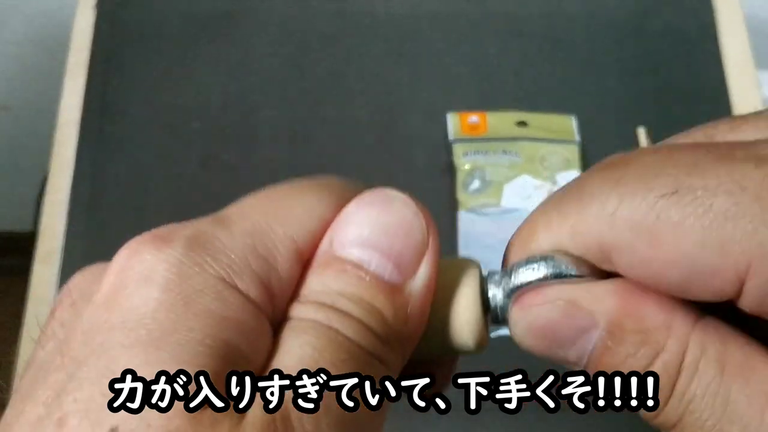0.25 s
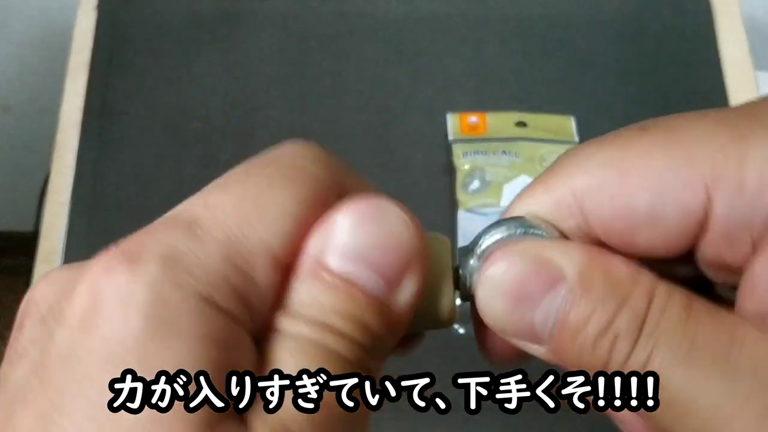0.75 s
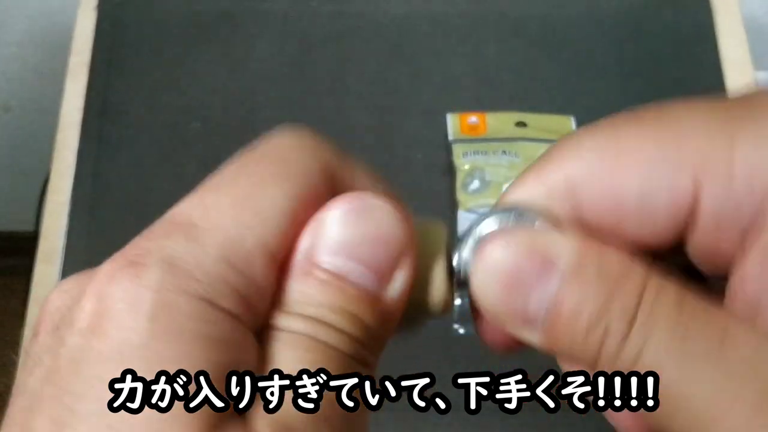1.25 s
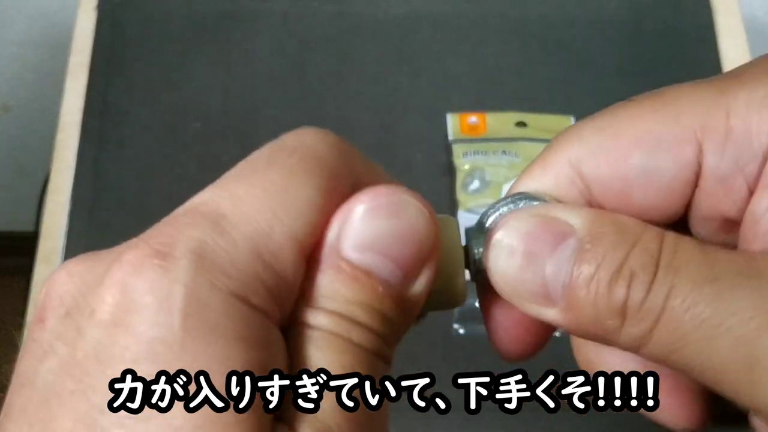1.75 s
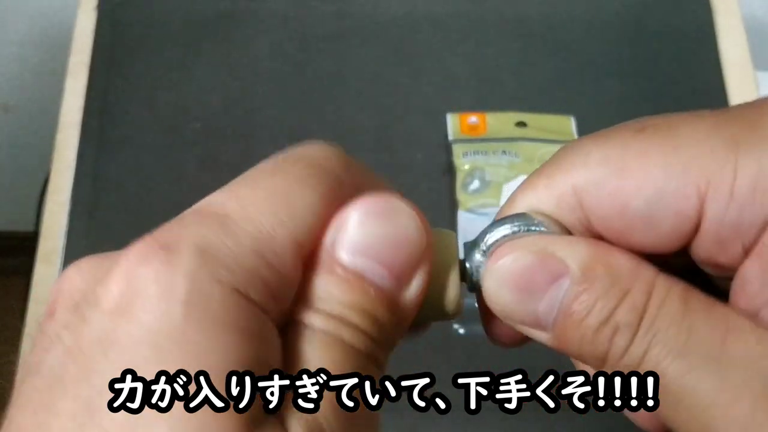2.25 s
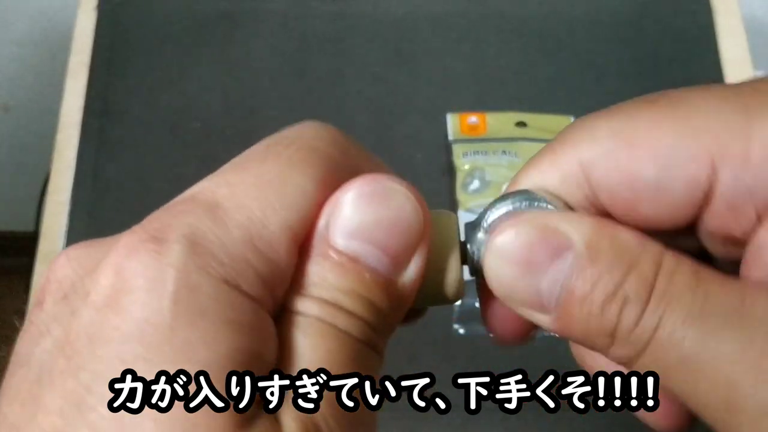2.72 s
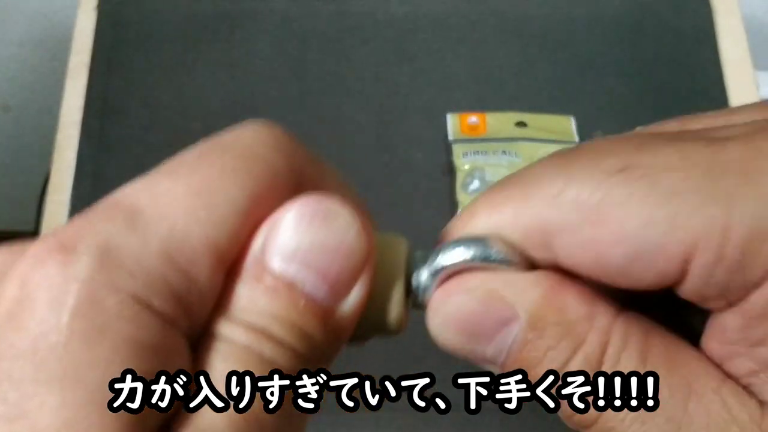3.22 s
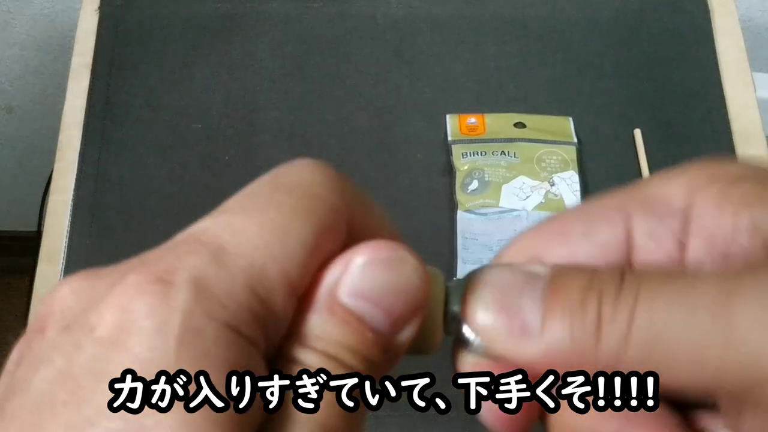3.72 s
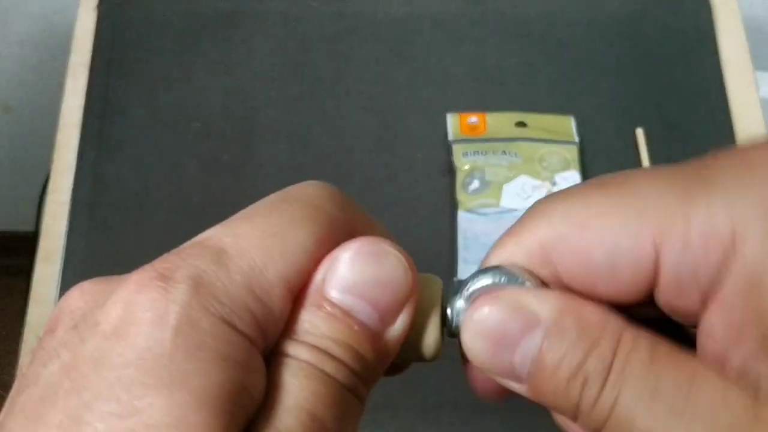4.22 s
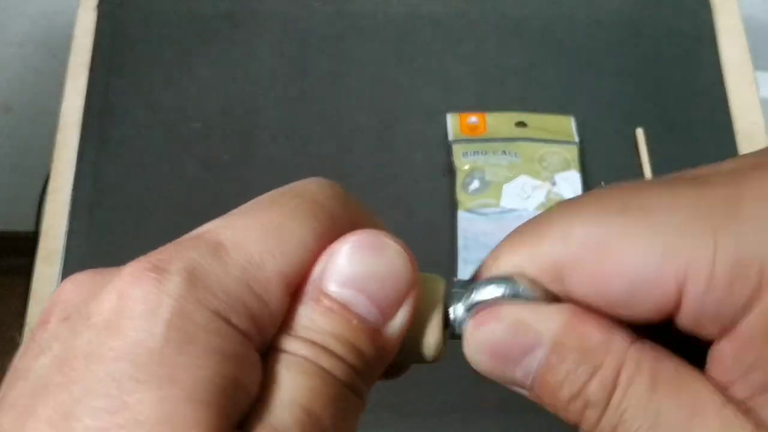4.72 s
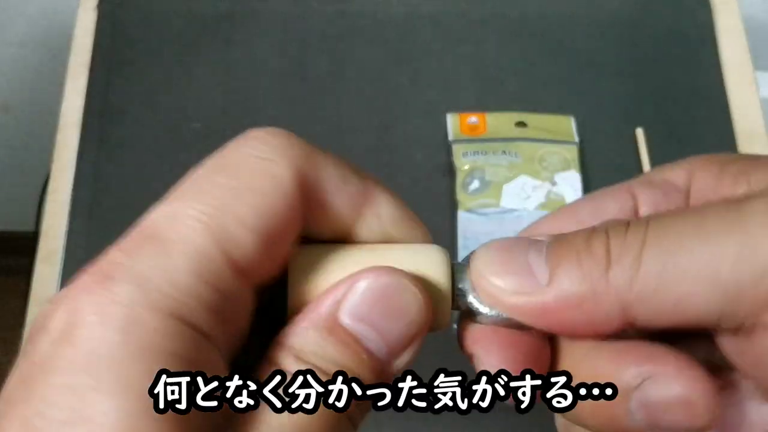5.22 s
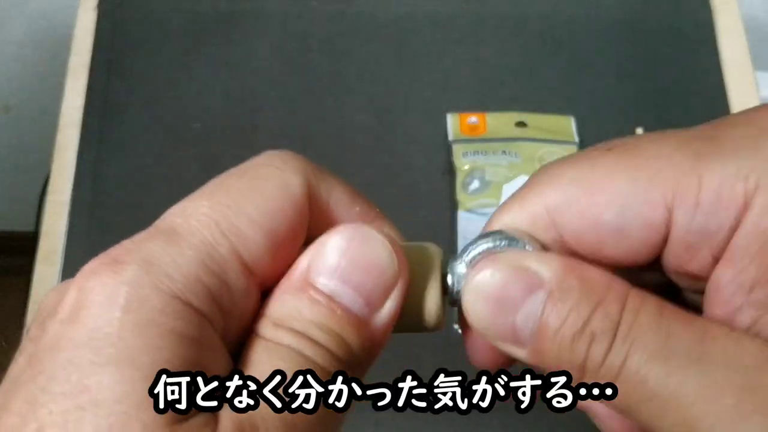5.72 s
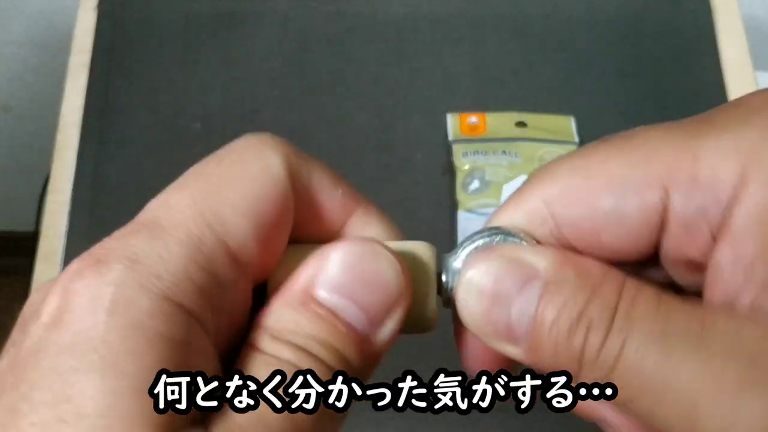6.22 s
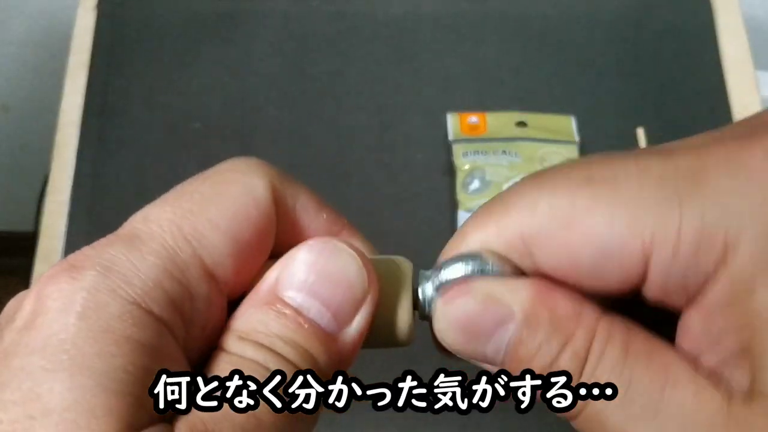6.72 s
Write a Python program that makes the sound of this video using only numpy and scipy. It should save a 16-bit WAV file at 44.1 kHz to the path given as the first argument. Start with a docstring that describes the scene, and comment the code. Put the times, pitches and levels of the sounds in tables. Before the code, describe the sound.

A metal bolt twists in a small wooden bird call, giving piercing, birdlike squeaks in uneven clumsy runs, very close in a quiet room.

```python
"""Wooden bird call twisted in a quiet room

A wooden bird call is twisted back and forth over a table, close to a small stereo recorder.
Its steel bolt sticks and slips in the wood: each twist is a gliding sine whistle near 6 kHz with its octave.
Now and then a dry snap is heard, made by clicks driving damped resonators. Near echoes and a tail of
decaying noise make the room, and shaped noise its hush. The loudest chirps clip and turn gritty."""
import sys
import numpy as np
from scipy import signal
from scipy.fft import rfft, irfft
from scipy.io import wavfile
from scipy.ndimage import uniform_filter1d, minimum_filter1d

SR = 44100
rng = np.random.default_rng(int(sys.argv[2]) if len(sys.argv) > 2 else 0)


def log_audio(samples):
    """Write samples as a 16-bit WAV file to the path given in sys.argv[1]."""
    # one column per channel
    frames = np.atleast_2d(samples).T
    # limit to full scale, then quantise
    limited = np.clip(frames, -1, 1)
    pcm = np.round(limited * 32767).astype(np.int16)
    wavfile.write(sys.argv[1], SR, pcm)


N = 306495  # length in samples

# The twists of the bolt. Each row: start in seconds, length in seconds, base pitch in Hz,
# glide from first to last in Hz, arch on the way in Hz, relative level in dB, swell from first to last
# in dB, relative level of the octave in dB, left over right in dB, lag of the right port in seconds.
TWISTS = [(0,0.037,6344,-11.5,-620,-2.5,-13.5,-18.5,-7,0.00006),
          (0.198,0.047,6474,131,371,-6.5,-3.5,-19,-3.5,7e-5),
          (.373,.059,6555,1013.5,302,-5.5,-2,-13,-6.5,6e-5),
          (0.472,0.052,6075,476.5,550.5,-6,-1.5,-24.5,-2,0.000057),
          (.683,0.035,5590,264,-220,-12.5,-4,-22.5,-6.5,0.000066),
          (0.765,0.018,5610,44,66,-20.5,6,-15,-3,0.000039),
          (0.782,0.036,6382,787.5,449.5,-7.5,-10.5,-16,-6.5,0.000049),
          (0.898,0.023,5460,-82,11,-25.5,-11,-22,-8,0.000087),
          (1.022,0.036,5337,-74,-85,-20,-13.5,-13,-5.5,0.000088),
          (1.087,0.017,6820,371,362,-9.5,10.5,-26.5,-13.5,4e-5),
          (1.174,0.053,6856,252,-620,-1,-4,-18.5,-5.5,42e-6),
          (1.276,0.041,6202,1543,651,-7,-5,-18,-8,0.000039),
          (1.74,0.015,5340,-560,-6,-13,-6,-16,-10,0.000058),
          (1.907,0.046,5956,1153,-220,-9.5,8,-16,-6.5,0.00007),
          (2.024,0.064,6123,305.5,-330,-8,7.5,-18.5,0.5,0.000063),
          (2.146,0.025,5155,-450,-200,-20.5,-18.5,-18.5,-6.5,78e-6),
          (2.299,0.013,5560,-310,-86,-19.5,4.5,-17,-7,0.000069),
          (2.433,0.048,5747,1397,60,-15.5,4,-17.5,-6.5,0.000092),
          (2.562,0.04,6135,181,152,-11,-10.5,-18.5,-11,0.000057),
          (2.668,0.022,5823,-11,176,-15.5,-15.5,-20.5,-3.5,0.000051),
          (2.75,0.015,6130,119,42,-10,3.5,-19.5,-16,52e-6),
          (2.835,0.026,5930,38,-5,-15.5,-7,-14.5,-3,0.000057),
          (2.92,0.03,5780,1080,549.5,-9.5,-1,-14.5,-8,57e-6),
          (3.011,0.029,6376,607,379,-6.5,-1.5,-20,-5.5,0.000049),
          (3.096,0.042,6016,4,-650,-6,-10,-19.5,-9,0.000081),
          (3.213,0.027,6340,-160,-32,-20,-7,-18,-14,0.000031),
          (3.357,0.062,5653,1104,-180,-22.5,10,-17.5,-8,0.0001),
          (3.592,0.049,5722,697.5,549.5,-9,7.5,-16.5,-4,0.000073),
          (3.631,0.063,6415,839.5,389.5,-6,-5.5,-20,-10.5,0.000053),
          (3.755,0.017,5820,-500,27,-14,-8,-9.5,-3,0.000034),
          (3.782,0.076,5450,-170,138,-15,2.5,-19,-5,0.000094),
          (3.947,0.025,5750,-6,179,-12,4,-17.5,-12.5,0.000051),
          (4.099,.051,5413,-650,739.5,-9,15,-18.5,-4,0.000073),
          (4.149,0.03,5843,950,-3.5,-5,-10.5,-18.5,-6.5,0.000075),
          (4.229,.047,5696,3,-480,-14.5,-10.5,-15,-27.5,0.000011),
          (4.479,0.047,5886,659,124,-17,-14.5,-20,-6.5,0.00009),
          (4.704,0.042,5957,98,-590,-6.5,-6,-21,-5.5,0.000065),
          (4.859,0.069,6070,-200,-600,-6.5,-10,-19.5,-3.5,0.000085),
          (5.081,0.034,6460,200,223.5,-17,3,-20,-14,0.000026),
          (5.294,0.023,6284,57,128.5,-4,-1,-12,-10.5,0.000047),
          (5.322,0.027,6192,-600,-950,-1.5,3,-16.5,-7.5,0.000046),
          (5.485,0.041,6190,43.5,-1.5,-8,-2,-15.5,-25.5,0.0000057),
          (5.676,0.062,5858,-1450,-520,-8,-7.5,-19.5,-1.5,0.000063),
          (6.037,0.0098,5825,42.5,62,-31.5,18,-17.5,-7.5,0.000012),
          (6.127,0.061,6105,269.5,538.5,-6,-3.5,-14,-10,53e-6),
          (6.258,0.04,5300,-300,136.5,-16.5,-14,-20.5,-5.5,0.0000082),
          (6.413,0.058,6043,41.5,-58.5,-10,-8.5,-16.5,-20,0.000048),
          (6.768,0.032,5462,84,105,-15.5,10,-12.5,-9.5,0.000011),
          (6.873,0.06,5970,981.5,-660,-1.5,-11,-16,-14.5,0.000065)]


def squeaks(level_db=0.5358, octave_trim_db=0.47, attack_s=0.0016, release_s=0.0051,
            jitter=0.005, wobble=0.0043, flutter_db=1.52, catch_s=0.0043, catch_jitter=0.025,
            octave_pan_db=6, pan_db_per_octave=30, middle_hz=5900, octave_lag_s=15e-6, lowest_hz=4600):
    """Stick-slip oscillation: friction locks on to a resonance that moves with pressure, rough then clean."""
    out = np.zeros((2, N))
    sway, wander, scatter, flutter = drift(90), drift(330), drift(700), drift(200)
    for start, length, pitch_hz, glide_hz, arch_hz, chirp_db, swell_db, octave_db, pan_db, lag_s in TWISTS:
        first = max(int(start * SR), 0)
        last = min(int((start + length + 4 * release_s) * SR), N)
        at = np.arange(first, last)
        age = np.maximum(at / SR - start, 0)
        progress = np.clip(age / length, 0, 1)
        pitch, effort_db = twist(progress, pitch_hz, glide_hz, arch_hz, swell_db)
        loudness_db = level_db + chirp_db + effort_db + flutter_db * flutter[at]

        onset = 1 - np.exp(-(age / attack_s) ** 2)
        release = np.exp(-(np.maximum(age - length, 0) / release_s) ** 2)
        grip = onset * release

        # relative pitch deviation; the catch roughens only the onset
        catch = catch_jitter * np.exp(-age / catch_s) * scatter[at]
        unrest = wobble * sway[at] + jitter * wander[at] + catch
        cycles = np.cumsum(pitch * (1 + unrest)) / SR
        phase = 2 * np.pi * (cycles - pitch * np.array([[0], [lag_s]]))

        # the casing shades the two ports by frequency; the octave bends round it a little later
        octave_left_db = octave_pan_db + pan_db_per_octave * np.log2(pitch / middle_hz)
        octave_phase = 2 * (phase - 2 * np.pi * pitch * np.array([[0], [octave_lag_s]]))
        tone = panned(pan_db) * np.sin(phase)
        overtone = panned(octave_left_db) * from_db(octave_db + octave_trim_db) * np.sin(octave_phase)
        out[:, at] += np.sqrt(2) * from_db(loudness_db) * grip * (tone + overtone)
    # the small block radiates nothing low
    return filtered(out, lowest_hz, "high", order=10)


ARCH_SKEW = 0.7  # below 1 the arch comes early in the twist
PRESSURE_DB_PER_OCTAVE = 26  # pressing harder makes the squeak both higher and louder
ENDS_DB = -4.5  # the bolt turns slowest at both ends of a twist


def twist(progress, pitch_hz, glide_hz, arch_hz, swell_db):
    """Pressure control of friction: pitch and level move together as pressure eases, with a push or dip."""
    glide = -glide_hz / 2 * np.cos(np.pi * progress)
    arch = arch_hz * np.sin(np.pi * progress ** ARCH_SKEW)
    hz = pitch_hz + glide + arch
    speed_db = swell_db * (progress - 0.5) + ENDS_DB * (1 - np.sin(np.pi * progress))
    pressure_db = PRESSURE_DB_PER_OCTAVE * np.log2(hz / pitch_hz)
    return hz, speed_db + pressure_db


# The moments when the bolt breaks loose. Each row: time in seconds, relative strength in dB.
BREAKS = [(0.6948, -45), (1.1772, -26.5), (2.311, -36.5), (2.6688, -42), (2.759, -28.5), (2.834, -38),
          (3.0145, -27), (3.231, -43), (3.756, -26), (4.7072, -26), (5.214, -56), (5.673, -46),
          (6.8813, -32)]
# The damped modes that a snap rings. Each row: frequency in Hz, relative level in dB,
# time to decay by 60 dB in seconds.
MODES = [(5720, 15.5, 0.02), (6940, -2.5, 0.019), (7950, -4.5, 0.0008), (10200, -7.5, 0.0034),
         (12600, -4, 0.0025)]


def snaps(level_db=2, spread_db=0.92, lowest_hz=5700):
    """Modal excitation: a click rings damped modes of wood and bolt, which are too small to radiate bass."""
    out = np.zeros((2, N))
    times, strength_db = np.transpose(BREAKS)
    for hz, mode_db, t60_s in MODES:
        clicks = np.zeros((2, N))
        scatter_db = rng.normal(0, spread_db, (len(times), 2)).T
        clicks[:, (times * SR).astype(int)] = from_db(strength_db + mode_db + level_db + scatter_db)
        # two-pole resonator
        radius = from_db(-60 / (t60_s * SR))
        angle = 2 * np.pi * hz / SR
        poles = [1, -2 * radius * np.cos(angle), radius ** 2]
        out += signal.lfilter([0.5, 0, -0.5], poles, clicks + 1e-18)
    return filtered(out, lowest_hz, "high", order=7)


# Reflections from nearby hands and table. Each row: left delay in seconds, right delay in seconds,
# level in dB relative to the direct sound.
REFLECTIONS = [(.0013, 0.00071, -19.5), (.0031, 0.0022, -18), (.0046, 0.0066, -13.5),
               (.0083, 0.0086, -23.5)]
ROOM_T60_S, ROOM_TREBLE_T60_S, ROOM_DB = 0.25, 0.18, -11


def room(x, build_s=0.0075, split_hz=9000, treble_db=-2, right_db=3, treble_left_db=4):
    """Reverberation: a few early reflections, then a dense diffuse tail that dies sooner in the treble."""
    t = np.arange(SR // 2) / SR
    # the tail is fed by the treble of the left side and the rest of the right
    source_treble = filtered(x[0], split_hz, "high", order=4)
    source_low = filtered(x[1], split_hz, "low", order=4)
    source = np.sqrt(0.5) * (source_treble + source_low)

    build = 1 - np.exp(-(t / build_s) ** 2)
    white = rng.standard_normal((2, len(t))) * build
    tails = [white * from_db(-60 * t / t60_s) for t60_s in (ROOM_T60_S, ROOM_TREBLE_T60_S)]
    low, high = [rms_one(tail) / np.sqrt(len(t)) for tail in tails]
    low_tail = filtered(low, split_hz, "low", order=4) * panned(-right_db)
    treble_tail = from_db(treble_db) * filtered(high, split_hz, "high", order=4) * panned(treble_left_db)
    far = signal.fftconvolve(source[None], low_tail + treble_tail, axes=1)[:, :N]

    near = sum(from_db(db) * np.array([delayed(x[0], left_s), delayed(x[1], right_s)])
               for left_s, right_s, db in REFLECTIONS)
    return near + from_db(ROOM_DB) * far


# Grit heard on the loudest chirps. Each row: frequency in Hz, relative spectral density in dB per Hz.
GRIT_SPECTRUM = [(30, 12), (100, 3.5), (300, -1), (1000, -9), (2500, -12.5), (5000, -13.5), (9000, -30.5),
                 (15000, -26.5)]


def limited_with_grit(x, ceiling=1.08, knee=0.85, grit_db=-23, smear_s=0.021, crackle_db=2.5, spill=0.13):
    """Limiting: gain falls to hold peaks near the ceiling; level past the knee adds uneven grit."""
    peak = -minimum_filter1d(-np.abs(x), size=9, axis=1)
    gain = uniform_filter1d(np.minimum(1, ceiling / (peak + 1e-9)), size=9, axis=1)
    excess = uniform_filter1d(np.clip(peak - knee, 0, 1), max(int(smear_s * SR), 1), axis=1)
    # some of the grit level of each side spills into the other
    excess = excess + spill * excess[::-1]
    crackle = from_db(grit_db + crackle_db * drift(180))
    return x * gain + crackle * excess * coloured(GRIT_SPECTRUM, alike=0.2)


# Background of the room and the microphones. Each row: frequency in Hz, relative spectral density
# in dB per Hz.
HUSH_SPECTRUM = [(15, -35), (25, 3.5), (119, -15.5), (177, -17.5), (271, -20), (372, -19), (1020, -27.5),
                 (2250, -29.5), (3260, -30), (4030, -29.5), (14000, -35.5)]
HUSH_DB = -54.5  # rms before the top is cut


def hush(pan_db=-2, top_hz=14200):
    """Stationary noise: low room rumble under a faint even hiss."""
    noise = filtered(coloured(HUSH_SPECTRUM, alike=0.06), top_hz, "low", order=16)
    return from_db(HUSH_DB) * panned(pan_db) * noise


def coloured(points, alike):
    """Spectral shaping: stereo noise of rms 1, a share of its power common to both sides."""
    hz = np.maximum(np.arange(N // 2 + 1) * SR / N, 1)
    points_hz, points_db = np.transpose(points)
    share = np.clip(alike, 0, 1)
    common = np.sqrt(share) * rng.standard_normal(N)
    white = common + np.sqrt(1 - share) * rng.standard_normal((2, N))
    shape = from_db(np.interp(np.log(hz), np.log(points_hz), points_db))
    return rms_one(irfft(rfft(white) * shape, N))


def panned(left_db):
    """Constant-power panning: left and right gains whose ratio is left_db."""
    gains = from_db(np.array([[0.5], [-0.5]]) * left_db)
    return gains / np.sqrt(np.mean(gains ** 2, axis=0))


def drift(rate_hz):
    """Band-limited noise: a smooth random wander of spread 1."""
    return rms_one(filtered(rng.standard_normal(N), rate_hz, "low", order=4))


def delayed(x, seconds):
    """Propagation delay: the same sound, later."""
    return np.pad(x, (int(abs(seconds) * SR), 0))[:N]


def filtered(x, hz, kind, order=2):
    """Butterworth filtering: a maximally flat pass band."""
    sos = signal.butter(order, np.clip(hz, 10, 0.45 * SR), kind, fs=SR, output="sos")
    return signal.sosfilt(sos, x)


def rms_one(x):
    """Normalisation: scale to unit root mean square."""
    return x / np.sqrt(np.mean(x ** 2) + 1e-20)


def from_db(db):
    """Logarithmic level: decibels to amplitude gain."""
    return 10 ** (np.asarray(db) / 20)


def scene():
    """Superposition: the call, its room and the background add."""
    call = squeaks() + snaps()
    return call + room(call) + hush()


CUTOFF_HZ = 14800


def record(dry):
    """Hard clipping and band limiting: loud chirps clip at full scale, then the top is cut."""
    clipped = np.clip(limited_with_grit(dry), -1, 1)
    top_cut = signal.cheby1(12, 0.05, CUTOFF_HZ, fs=SR, output="sos")
    return signal.sosfilt(top_cut, clipped)


dry = scene()
out = record(dry)
log_audio(out)
```